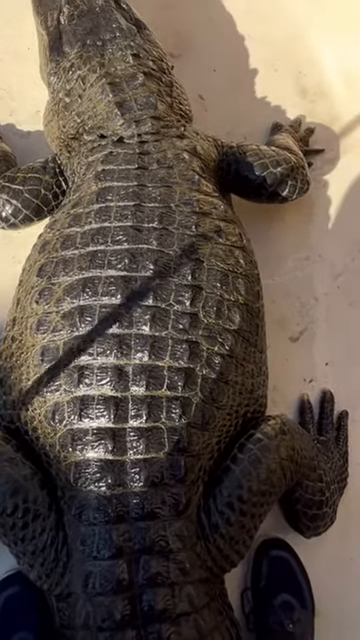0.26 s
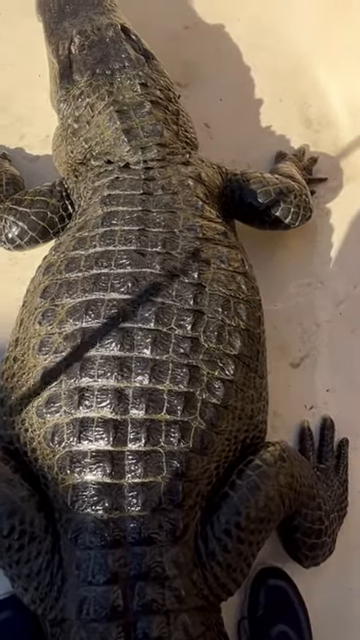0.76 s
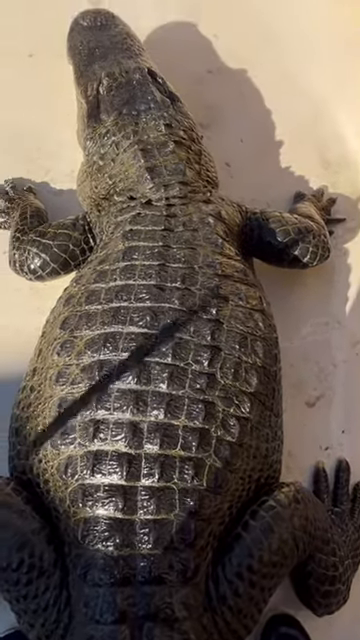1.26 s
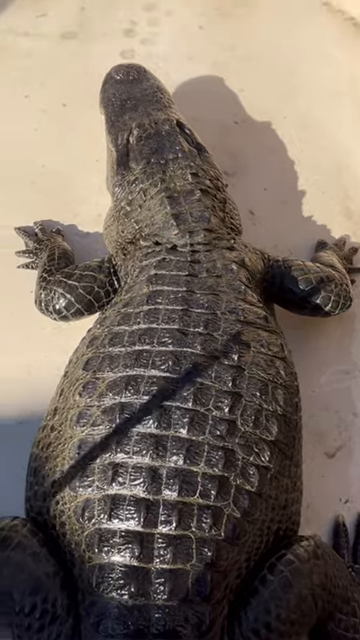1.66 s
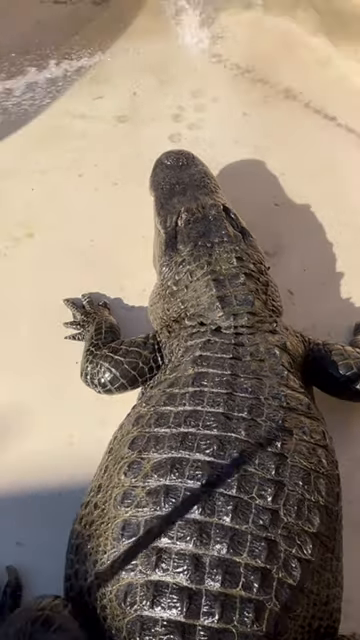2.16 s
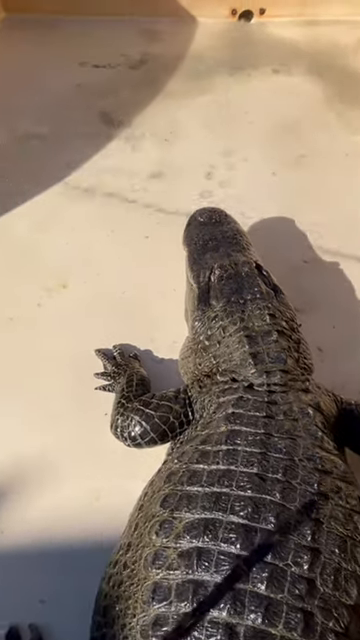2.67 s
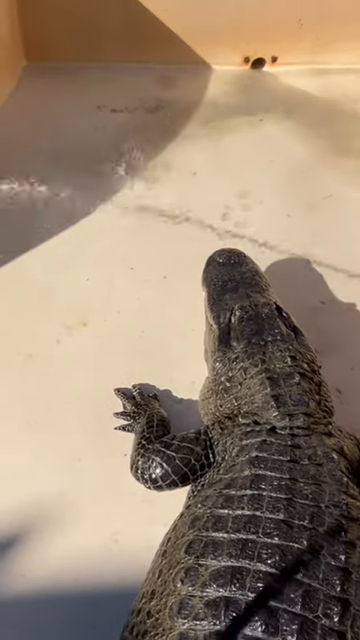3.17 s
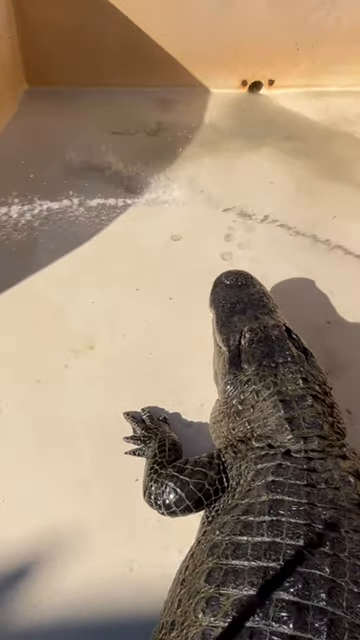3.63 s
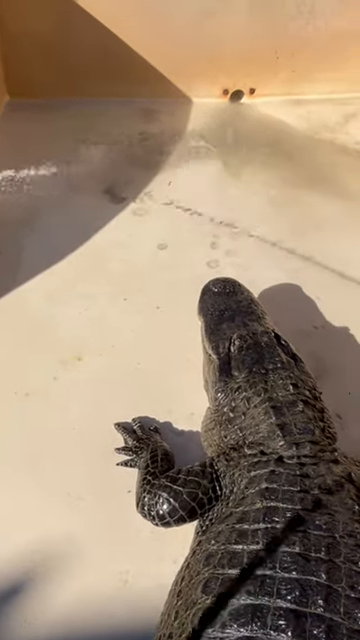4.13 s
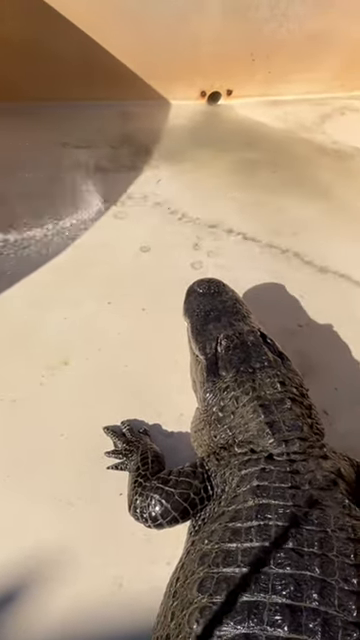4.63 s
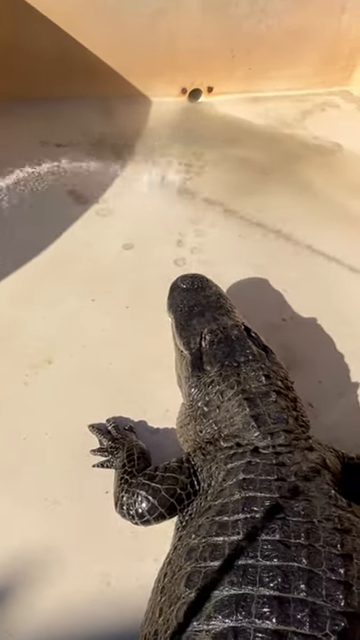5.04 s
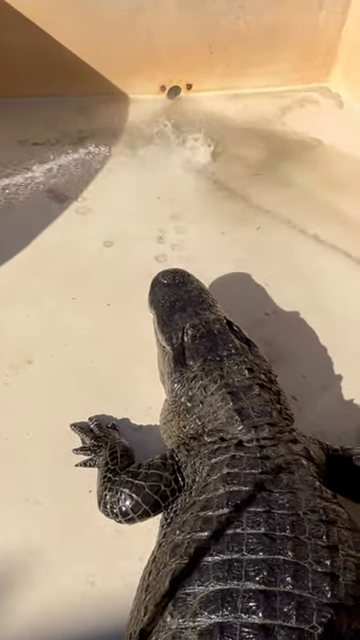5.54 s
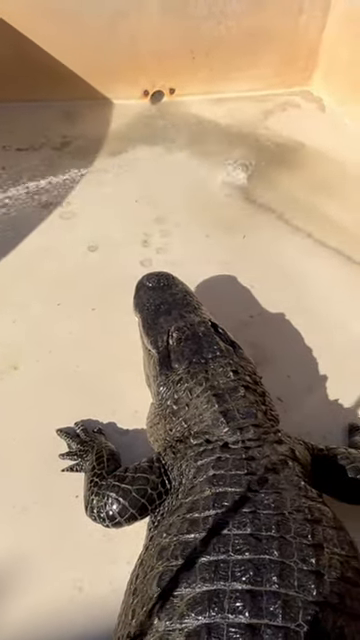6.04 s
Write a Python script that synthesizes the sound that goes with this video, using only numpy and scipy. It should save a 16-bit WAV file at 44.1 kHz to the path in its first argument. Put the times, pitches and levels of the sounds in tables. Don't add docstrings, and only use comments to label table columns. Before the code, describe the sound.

A garden hose jet hisses steadily close by while its swinging stream splatters and gurgles through a shallow puddle on a hard outdoor floor.

```python
import sys
import numpy as np
from scipy import signal
from scipy.fft import rfft, irfft, next_fast_len
from scipy.io import wavfile
from scipy.ndimage import map_coordinates

SR = 44100
rng = np.random.default_rng(int(sys.argv[2]) if len(sys.argv) > 2 else 0)


def to_wav(sig):
    pcm = np.clip(np.atleast_2d(sig), -1, 1) * 32767
    pcm = np.round(pcm).astype(np.int16)
    wavfile.write(sys.argv[1], SR, pcm.T)


def undo_db(level):
    steps = np.asarray(level, float) / 20
    return 10 ** steps


N = 277830

# pitch_hz, density_db (per Hz)
RUMBLE_COLOUR = [(15, -38), (25, -35), (51, 2), (76, 2.5), (163, -3), (361, 0.5), (600, -6), (763, 1),
                 (900, -39), (1170, -41), (1980, -120)]
# start_s, level_db
RUMBLE_SWELL = [
    (0.0, -46),
    (0.6, -49),
    (2.7, -52.5),
    (3.0, -49.5),
    (3.2, -56.5),
    (3.4, -52.5),
    (6.3, -52),
]
MOTOR_HZ, MOTOR_WIDTH_HZ, MOTOR_DB = 73, 4.7, -58.5
# pitch_hz, density_db (per Hz)
NOZZLE_COLOUR = [(400, -22.5), (700, -10), (1150, -5.5), (1500, -6), (1900, -8), (3000, -6), (4500, -0.5),
                 (5600, 2.5), (7000, 0.5), (8500, -5.5), (9600, -5.5), (11000, -3.5), (13500, -12)]
# start_s, level_db
NOZZLE_LEVEL = [(0.0, -30.5), (0.37, -28), (1.24, -26), (1.51, -27.5), (1.72, -27.5), (1.98, -27),
                (2.16, -26), (2.37, -29), (2.77, -30.5), (3.28, -30), (3.67, -28.5), (3.88, -29.5),
                (4.92, -30.5), (4.98, -29), (5.3, -27.5), (5.93, -29.5), (6.3, -32)]
# start_s, lead_ms
NOZZLE_LEAD = [(0, .417), (1.0, .431), (1.9, .42), (2.8, .442), (3.7, .426), (6.3, .418)]
# start_s, lead_ms
SPLASH_LEAD = [(0, -0.33), (1.2, -0.13), (1.5, -0.11), (2, -0.17), (2.5, -0.074), (3.7, -0.019),
               (4.2, 0.069), (5.2, 0.16), (6.3, 0.16)]
LAYER_HZ = [
    900,
    2400,
    5800,
    11000,
]
# pitch_hz, density_db (per Hz)
SPRAY_COLOUR = [(250, -39), (500, -12), (1100, -9), (1500, -10.5), (2400, -3), (4000, 2.5), (5400, 1),
                (6600, -2), (7800, 0.5), (8600, -4), (9600, -3), (10400, -0.5), (13500, -2.5)]
SPRAY_DB, BUBBLE_DB = -29, -24.5
# start_s, digging_db (into the puddle), fanning_db (out on the floor), pan_db (left-right)
AIM = [(0, 6, 1.5, 1), (.45, 5.5, -3.5, 2), (.85, 7.5, -3.5, -0.5), (1.4, 5, -3, 2), (1.88, 8.5, -1.5, -3),
       (2.03, -1, 2, -3.5), (2.25, 1.5, 3, -3), (2.58, 3, 1, 2), (2.68, -7, -3, 0.5),
       (3.33, -12, -0.5, -0.5), (3.5, 1, 1.5, -1.5), (4.1, -3, -1, -1), (4.5, -18.5, 1, -1),
       (4.92, -2.5, 0, 0.5), (4.99, 5.5, -2, -0.5), (5.55, 5, 0.5, 0.5), (5.9, -5, 0, -3),
       (6.3, -2.5, -3, -5.5)]
# centre_s, swell_db, length_s, depth (0-2)
CROSSINGS = [(.01, 8.5, 0.042, 0.7), (.13, 2, 0.046, 0.3), (0.305, 9, 0.05, 0.2), (0.558, 10, 0.038, .3),
             (0.745, 10.5, 0.049, 0.45), (0.958, 6, 0.1, 0.46), (1.119, 7.5, 0.04, .1),
             (1.335, 8, 0.054, .2), (1.556, 8.5, 0.088, .6), (1.756, 4.5, 0.067, .8), (2.095, 11, 0.05, .7),
             (2.323, 8, 0.043, 0.7), (2.513, 0.5, 0.12, 0.3), (2.729, 10.5, 0.03, 0.3),
             (2.866, 7, 0.037, 0.6), (2.983, 9, 0.079, 0.55), (3.1, 6.5, 0.08, 0.7), (3.372, 8, 0.034, 1),
             (3.55, 10, 0.045, 0.6), (3.833, 8.5, 0.059, .6), (4.107, 9, 0.21, .3), (4.33, 11, 0.1, 0.5),
             (4.432, 10, 0.055, 0.95), (4.6, 14, 0.13, 0.54), (5.137, 0.5, 0.28, 0), (5.378, 5, 0.06, 1.8),
             (5.612, 8, 0.039, 0.8), (5.738, 6, .06, 1.0), (6, 7.5, 0.047, .6), (6.14, 0.5, .06, 0)]
# centre_s, swell_db
SPITS = [(.14, 6.5), (.28, 8.5), (.62, 3), (.91, 4), (1.1, 4), (1.32, 6), (1.48, 4.5), (1.87, 3.5),
         (2.39, 3), (2.74, 9), (2.86, 5), (2.98, 5), (3.1, 4), (3.62, 3), (4.4, 3.5), (4.62, 0.5),
         (5.09, 3), (5.22, 0), (5.58, 2), (6.14, 3.5)]
SPIT_S = 0.053
LAYER_RESPONSE = [
    (0.49, .05, 0.041, 1.5, 0.5),
    (1.12, 0.055, 1.12, -0.015, 0.23),
    (0.12, 1.7, 0.34, -0.12, 0.46),
    (0.053, 0.15, 0.046, -.1, 0.9),
]
# centre_s, dip_db
FALTERS = [(.45, -1.5), (.68, -2.5), (1.64, -0.5), (2.67, -2), (2.8, 0), (2.92, -0.5), (3.06, -2),
           (3.18, -2.5), (3.33, 0), (3.93, -2), (4.23, 0.5), (4.5, -2.5), (4.76, -2), (4.9, -1),
           (5.5, -1.5), (5.67, -1)]
FALTER_S = 0.037
# pitch_hz, tilt_db (left-right), nozzle_likeness (0-1), splash_likeness (0-1), left_lead_rad
PORTS = [(60, -2, 0.81, .5, 0.34), (296, -1, 0.9, 0.1, -0.7), (490, -6.5, 0.19, .2, -0.5),
         (643, -2.5, 0.65, 0.98, 1), (1120, 3, 0.79, 0.98, -.5), (1580, -5, 0.96, 0.2, -1),
         (1875, -2, 0.53, 0, 1.5), (2680, -3.5, 0.71, 0.21, 2), (4300, -3, 1, 0, -0.5),
         (6260, -1, 0.64, 0.55, 0.5), (7370, -6.5, 0.99, 0.62, 0), (8940, -4, 0.79, 0, 1.5),
         (9400, -17, 0.38, 0.68, -0.5), (10200, 3, 0.22, 0, -13.5)]
# start_s, turn, tilt, roll (about -1 to 1)
HAND = [(0, 0.79, 1, 0.88), (.4, 1.05, 0.32, 0.99), (.8, 0.73, -0.16, -0.029), (1.6, 0.81, -0.97, -0.7),
        (1.87, 0.4, 0.37, -0.57), (2.3, -0.19, 0.0027, -1.05), (2.55, -0.18, -0.24, 0.74),
        (3.3, -0.04, -0.15, .55), (3.6, -0.038, -0.038, -.45), (4.2, -0.26, -0.27, 1),
        (4.9, -.1, 0.13, -.1), (5.4, 0.14, -0.014, -0.39), (5.9, -0.013, 0.64, -1), (6.3, 0.014, 1, -0.96)]
# centre_hz, turn_hz, roll_hz (per unit), width_hz, lift_db, turn_db, tilt_db (per unit)
LEFT_RIDGES = [(5880, 30, 900, 850, 1, 4.5, 3), (8550, 1400, -100, 600, -0.6, 4.5, 1),
               (9600, 30, 30, 600, 3, -2, 4.5), (3600, 30, 30, 400, -1.4, -7, -3),
               (12300, 30, 30, 2300, 0.4, 1.5, 5.5)]
RIGHT_RIDGES = [(6150, 870, 30, 660, 3.5, -3, 7.5), (5300, 310, 60, 670, -2.5, 7.5, 1.5),
                (8210, 30, -100, 550, -5.5, 9, -1.5), (6360, 30, 30, 370, -0.7, -3, -3),
                (9270, 30, 30, 380, -3, 3, 2.5), (12300, 30, 30, 2100, 1.7, -0.5, -5.5)]
# low_hz, high_hz, sum_share, difference_share (of blocks, 0-1), sum_db,
# difference_db
TOP_BANDS = [(10000, 10340, 1, 1, -2, -5), (10340, 11030, 1, .015, 0, -5), (11030, 13080, 1, 0, 0, 0),
             (13080, 13780, 1, .5, -2, -5), (13780, 14470, .7, 1, -6.5, -1.5), (14470, 15160, .2, 1, -6, 0),
             (15160, 15750, .01, 1, -4, 1.5)]
BLOCK, BLOCK_START = 1024, 282


def rms_one(x):
    return x / np.sqrt(np.mean(x ** 2) + 1e-20)


def in_time(rows):
    s, *columns = np.transpose(rows)
    return np.array([np.interp(np.arange(N) / SR, s, c) for c in columns])


def coloured(x, spectrum):
    hz, level_db = np.transpose(spectrum)
    size = next_fast_len(N)
    bins = np.log(np.arange(size // 2 + 1) * SR / size + 1)
    gain = undo_db(np.interp(bins, np.log(hz), level_db))
    return irfft(rfft(x, size) * gain, size)[..., :N]


def drift(rate):
    r = np.exp(-80 * np.pi * rate / SR)
    slow = signal.lfilter([1], [1, -2 * r, r * r], rng.standard_normal(N // 40 + 2002))[2000:]
    return np.interp(np.arange(N) / 40, np.arange(len(slow)), rms_one(slow))


def swells(s, level_db, length_s):
    t = np.arange(0, N, 32)[:, None] / SR
    bells = np.exp(-2.8 * ((t - s) / length_s) ** 2)
    return np.interp(np.arange(N) / SR, t[:, 0], bells @ level_db)


def resonator(hz, r):
    return [1, -2 * r * np.cos(2 * np.pi * hz / SR), r * r]


def rumble():
    traffic = rms_one(coloured(rng.standard_normal((2, N)), RUMBLE_COLOUR))
    ring = resonator(MOTOR_HZ, np.exp(-np.pi * MOTOR_WIDTH_HZ / SR))
    motor = signal.lfilter([1, 0, -1], ring, rng.standard_normal((2, N)))
    return undo_db(in_time(RUMBLE_SWELL)[0] + 4.0) * traffic + undo_db(MOTOR_DB) * rms_one(motor)


def nozzle():
    level_db = in_time(NOZZLE_LEVEL)[0] - 1 + 0.5 * drift(7.9)
    return undo_db(level_db) * rms_one(coloured(rng.standard_normal((2, N)), NOZZLE_COLOUR))


def jet():
    digging_db, fanning_db, pan_db = in_time(AIM)
    s, swell_db, length_s, depth = np.transpose(CROSSINGS)
    crossing_db = swells(s, swell_db, length_s)
    deep_db = swells(s, swell_db * depth, length_s)
    spit_db = swells(*np.transpose(SPITS), SPIT_S)
    causes = [digging_db, fanning_db, crossing_db, deep_db, spit_db]
    return np.array(LAYER_RESPONSE) @ causes, pan_db


def drops(per_s, spread_db):
    sizes = undo_db(spread_db * np.minimum(rng.exponential(1, (2, N)), 5)) * rng.choice([-1, 1], (2, N))
    landed = rng.random((2, N)) < per_s / SR
    return sizes * landed + 1e-18


def bubbles(per_s, cycles, low_hz, high_hz):
    hits = drops(per_s * undo_db(0.8 * drift(2.2)), 2.3)
    dealt = rng.integers(0, 14, N)
    out = 0
    for k, hz in enumerate(np.geomspace(low_hz, high_hz, 14)):
        ring = resonator(hz, undo_db(-60 * hz / (cycles * SR)))
        out = out + signal.lfilter([0, np.sin(2 * np.pi * hz / SR)], ring, hits * (dealt == k))
    return rms_one(np.diff(out, prepend=0))


def spray(together_db, patchy_db):
    layers_db, pan_db = jet()
    swing_db = layers_db - np.mean(layers_db, axis=1, keepdims=True)
    froth = undo_db(BUBBLE_DB) * bubbles(per_s=820, cycles=30.0, low_hz=720, high_hz=6170)
    water = []
    for k in range(2):
        patter = undo_db(-4.5) * rms_one(drops(1200, 5.3))
        water.append(rng.standard_normal((2, N)) + patter + froth)
    surge = drift(21.5)
    edges = 280 * 2 ** np.arange(0, 6.1, .3)
    out = 0
    for k, (low, high) in enumerate(zip(edges, edges[1:])):
        place = np.interp(np.log(np.sqrt(low * high)), np.log(LAYER_HZ), np.arange(4))
        share = np.clip(1 - abs(place - np.arange(4)), 0, 1)
        patches = drift(16.4) + 0.8 * drift(46)
        gain = undo_db(0.93 * share @ swing_db + together_db * surge + patchy_db * patches)
        band = signal.butter(2, [low, high], "band", fs=SR, output="sos")
        out = out + gain * signal.sosfilt(band, water[k % 2])
    return undo_db(SPRAY_DB) * rms_one(coloured(out, SPRAY_COLOUR)), pan_db - pan_db.mean()


def ports(sound, lead_ms, order):
    direct, scattered = sound
    shifted = map_coordinates(direct, [np.arange(N) - lead_ms * SR / 1000], order=5, mode="mirror")
    hz, *columns = np.transpose(PORTS)
    size = next_fast_len(N)
    table = [np.interp(np.arange(size // 2 + 1) * SR / size, hz, c) for c in columns]
    tilt_db, alike = table[0], np.clip(table[order], 0, 1)
    extra_rad = table[3] * (order == 1)
    right = alike * rfft(shifted, size) * np.exp(-1j * extra_rad)
    right = right + np.sqrt(1 - alike ** 2) * rfft(scattered, size)
    left = rfft(direct, size)
    return irfft([left * undo_db(tilt_db / 2), right * undo_db(-tilt_db / 2)], size)[:, :N]


def turning(heard):
    hz, s, frames = signal.stft(heard, SR, nperseg=256)
    at, *angles = np.transpose(HAND)
    turn, tilt, roll = [np.interp(s, at, angle) for angle in angles]
    for port, ridges in enumerate([LEFT_RIDGES, RIGHT_RIDGES]):
        for centre_hz, turn_hz, roll_hz, width_hz, lift_db, turn_db, tilt_db in ridges:
            ridge_hz = centre_hz + turn_hz * turn + roll_hz * roll
            shape = np.exp(-((hz[:, None] - ridge_hz) / width_hz) ** 2)
            frames[port] *= undo_db((lift_db + turn_db * turn + tilt_db * tilt) * shape)
    return signal.istft(frames, SR, nperseg=256)[1][:, :N]


def scene():
    nozzle_lead_ms = in_time(NOZZLE_LEAD)[0]
    background = ports(rumble(), nozzle_lead_ms, order=1)
    hiss = ports(nozzle(), nozzle_lead_ms, order=1)
    water, pan_db = spray(together_db=1.37, patchy_db=1.6)
    splash = ports(water, in_time(SPLASH_LEAD)[0], order=2) * undo_db(pan_db * [[.5], [-.5]])
    pressure = undo_db(swells(*np.transpose(FALTERS), FALTER_S))
    return turning(pressure * (splash + hiss)) + background


def thinned_top(dry):
    spectra = rfft(np.array([dry[0] + dry[1], dry[0] - dry[1]]) / 2)
    hz = np.arange(N // 2 + 1) * SR / N
    blocks = np.arange(N // BLOCK + 3)
    out = irfft(spectra * (hz < TOP_BANDS[0][0]), N)
    luck = [signal.lfilter([1, 1], [1], rng.random(len(blocks))) / 2 for k in range(2)]
    for low, high, *shares, sum_db, difference_db in TOP_BANDS:
        band = irfft(spectra * (hz >= low) * (hz < high), N) * undo_db(np.array([[sum_db], [difference_db]]))
        for k in range(2):
            kept = luck[k] <= np.quantile(luck[k], shares[k]) - (shares[k] == 0)
            fade = np.interp(np.arange(N), BLOCK_START + BLOCK * (blocks - 1), kept)
            out[k] += band[k] * np.sin(np.pi / 2 * fade) ** 2
    return np.array([out[0] + out[1], out[0] - out[1]])


def band_limit(x):
    return signal.sosfilt(signal.butter(12, 16050, fs=SR, output="sos"), x)


def record(dry):
    mix = thinned_top(dry)
    return band_limit(mix)


dry = scene()
out = record(dry)
to_wav(out)
```